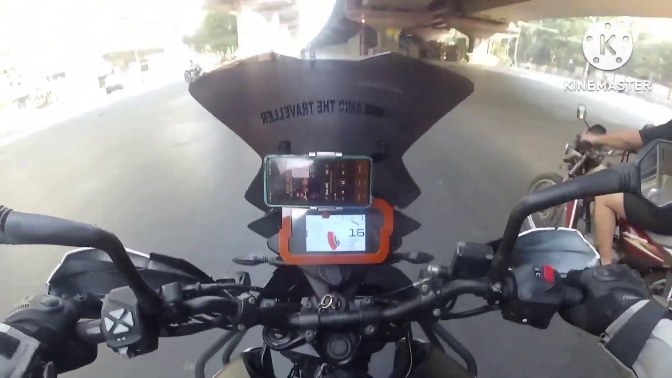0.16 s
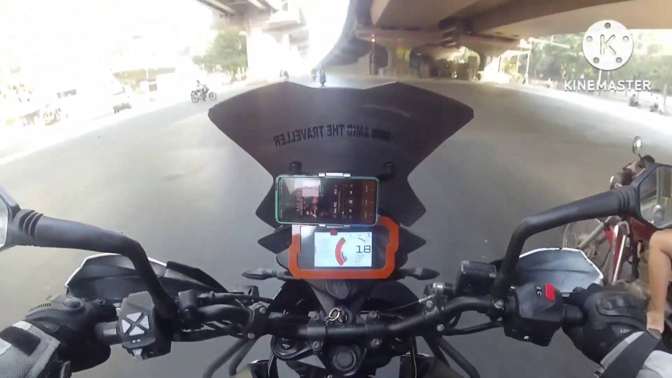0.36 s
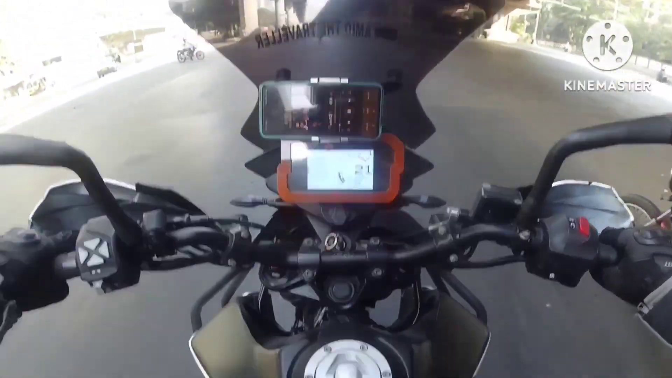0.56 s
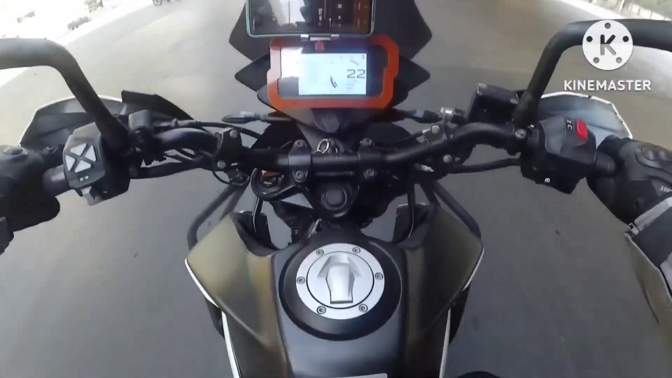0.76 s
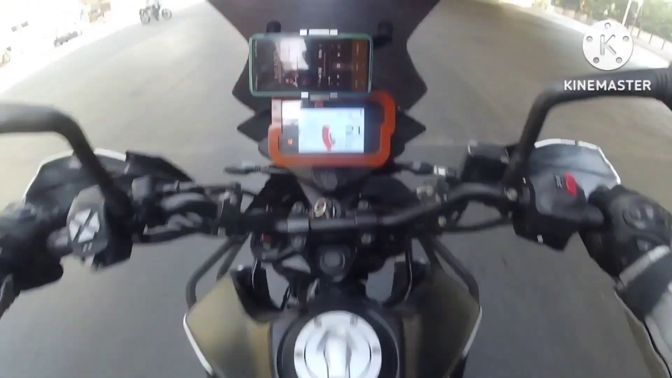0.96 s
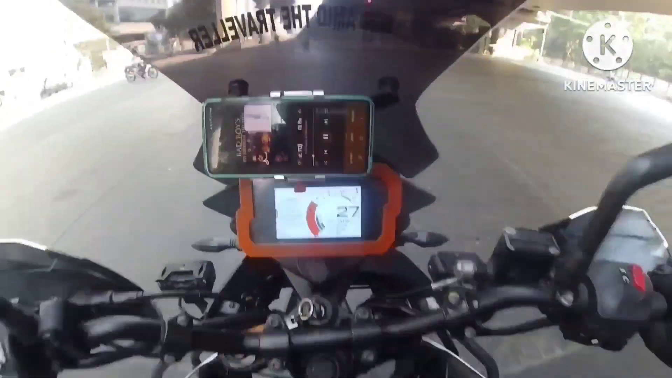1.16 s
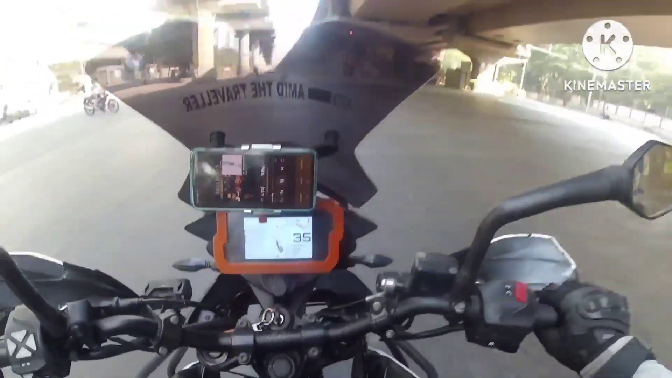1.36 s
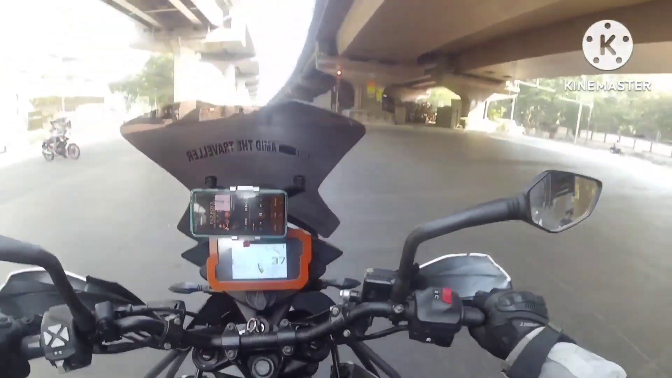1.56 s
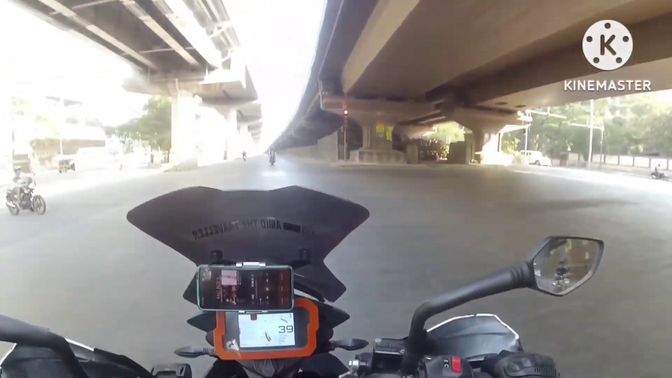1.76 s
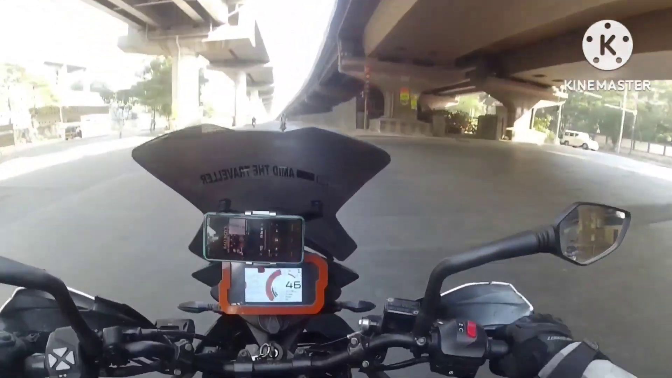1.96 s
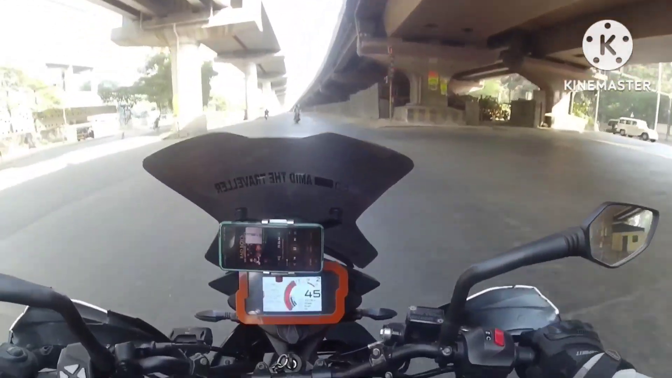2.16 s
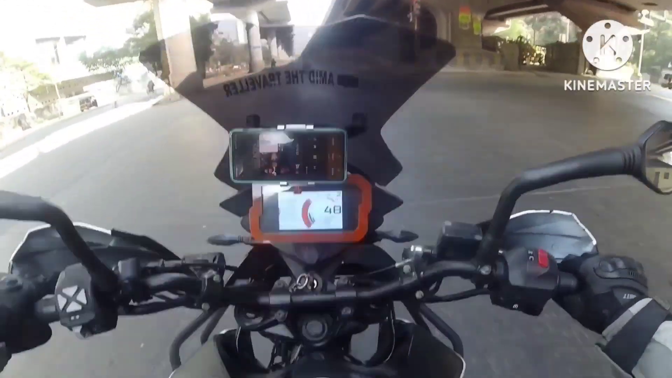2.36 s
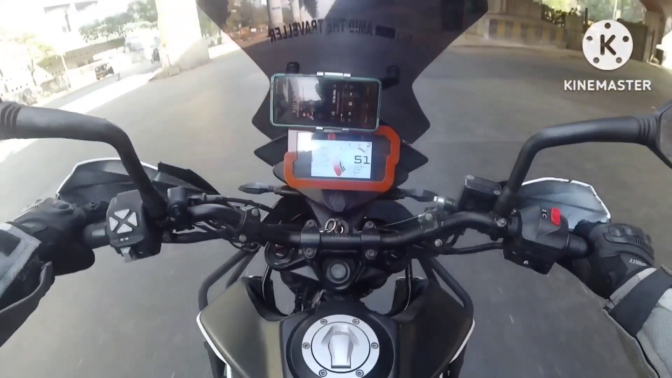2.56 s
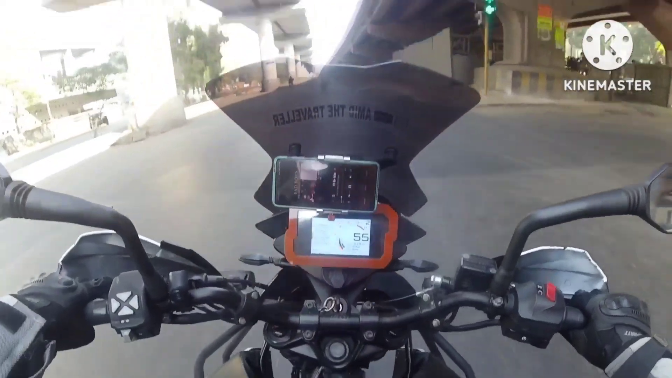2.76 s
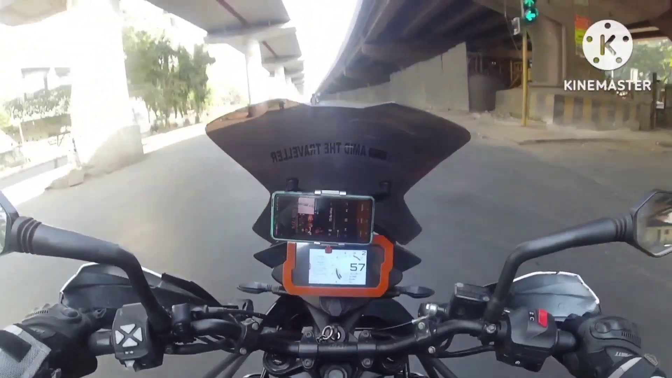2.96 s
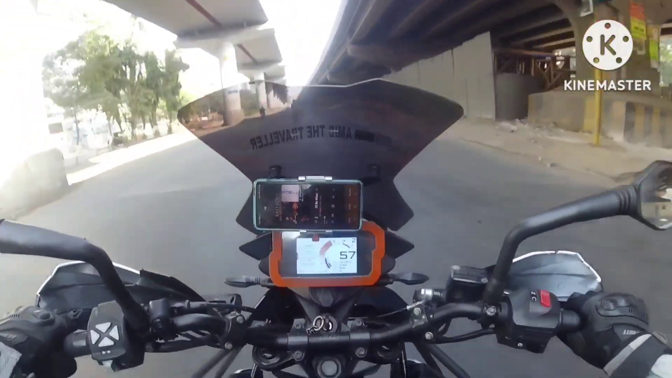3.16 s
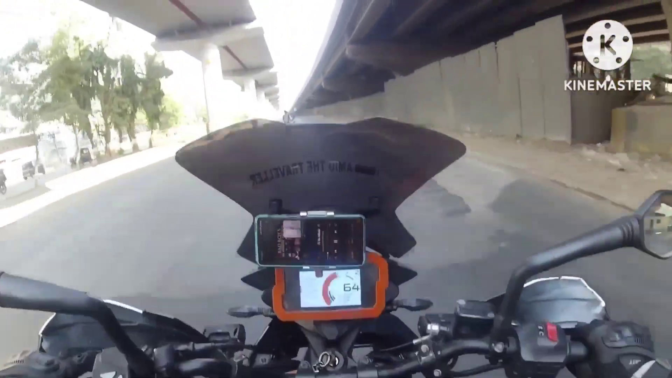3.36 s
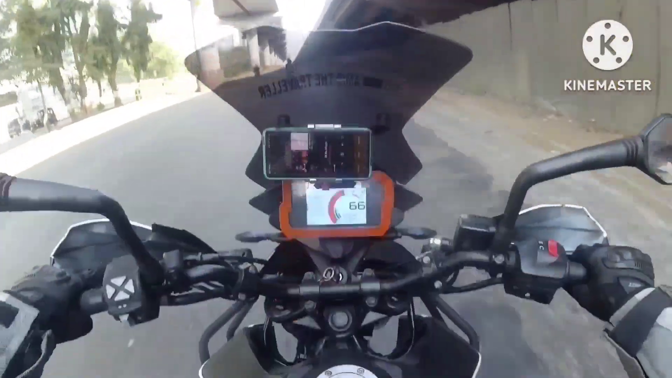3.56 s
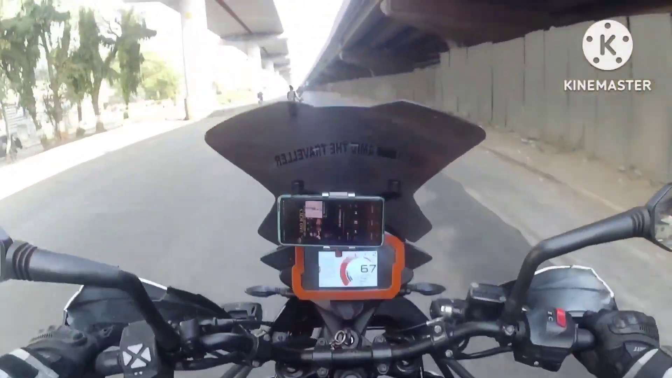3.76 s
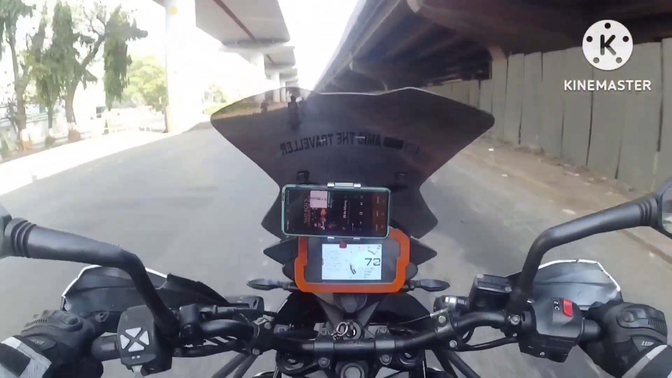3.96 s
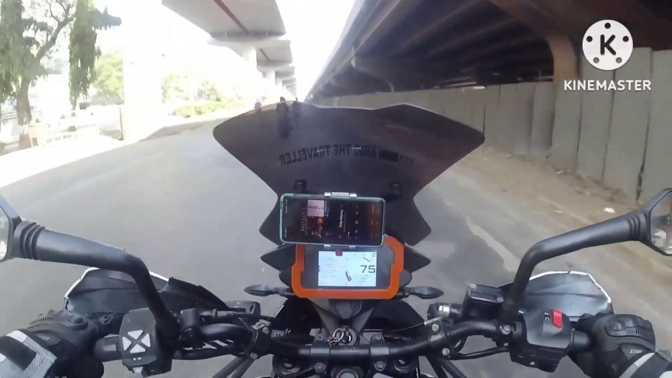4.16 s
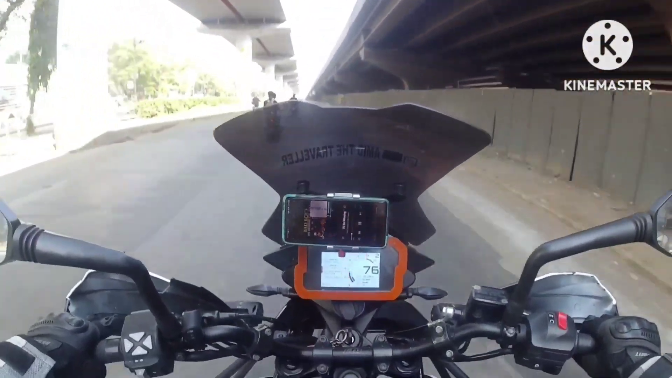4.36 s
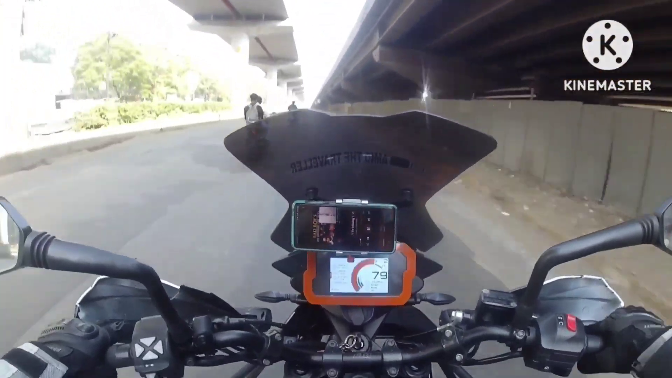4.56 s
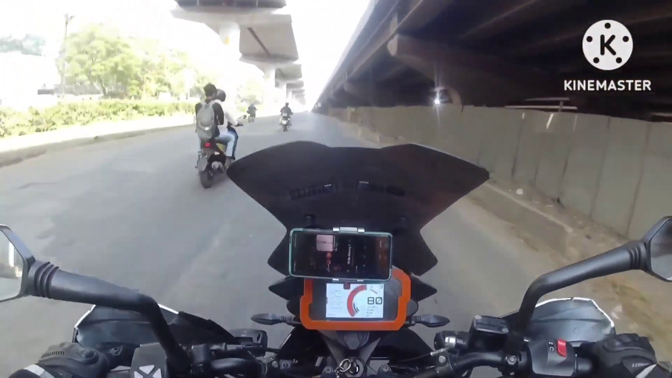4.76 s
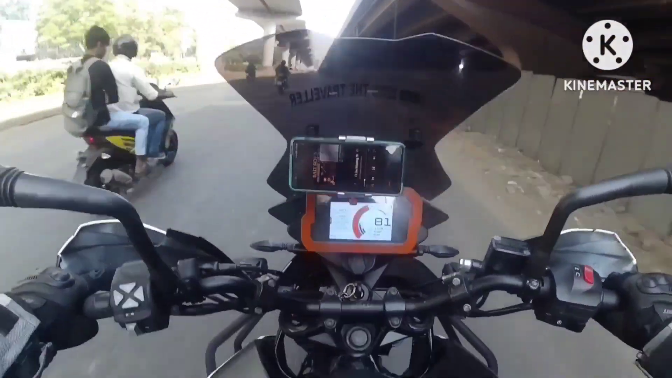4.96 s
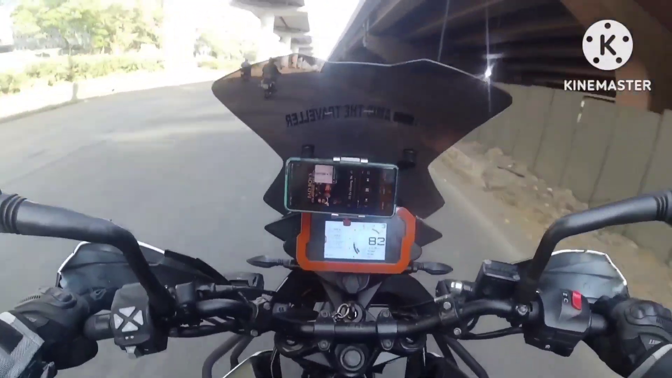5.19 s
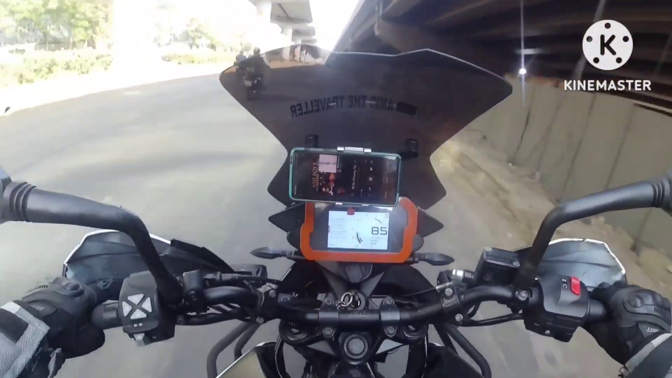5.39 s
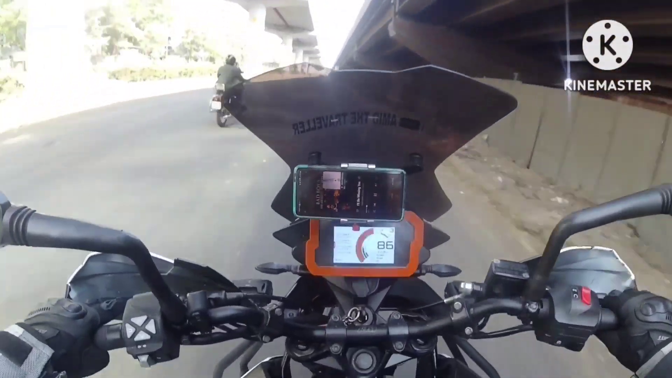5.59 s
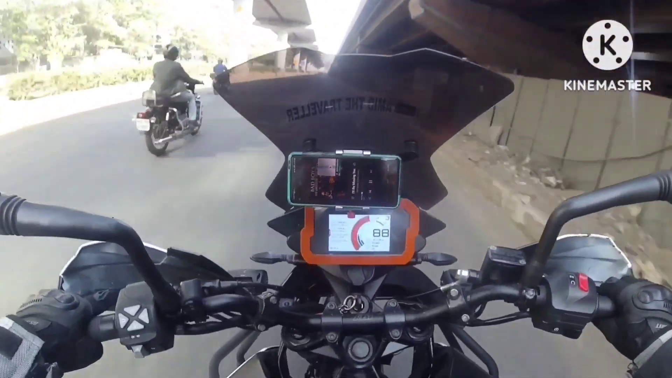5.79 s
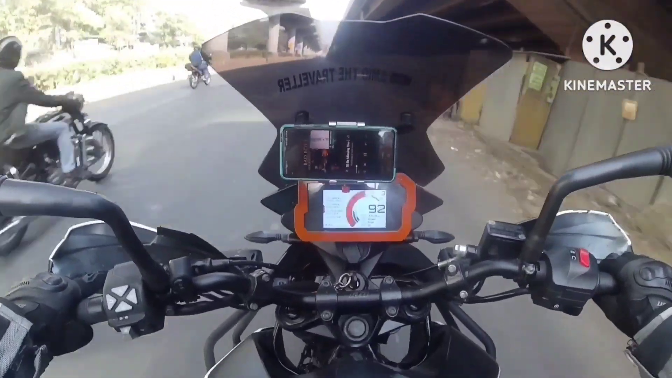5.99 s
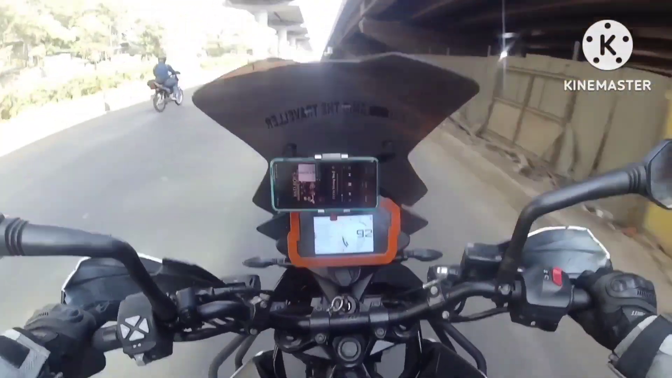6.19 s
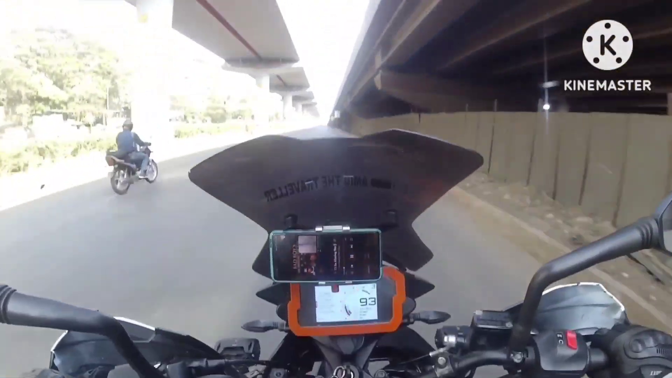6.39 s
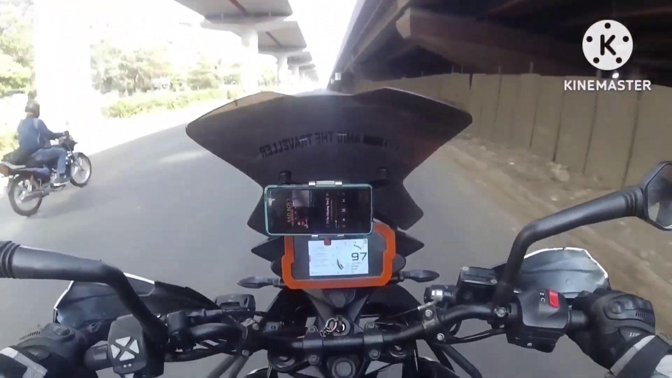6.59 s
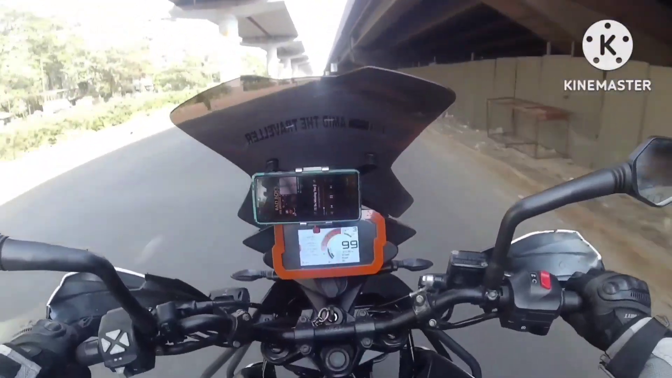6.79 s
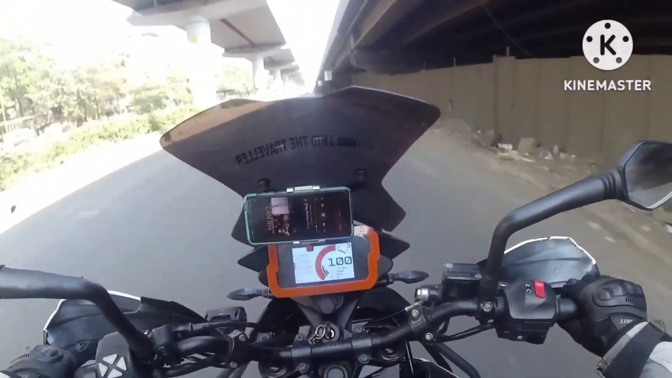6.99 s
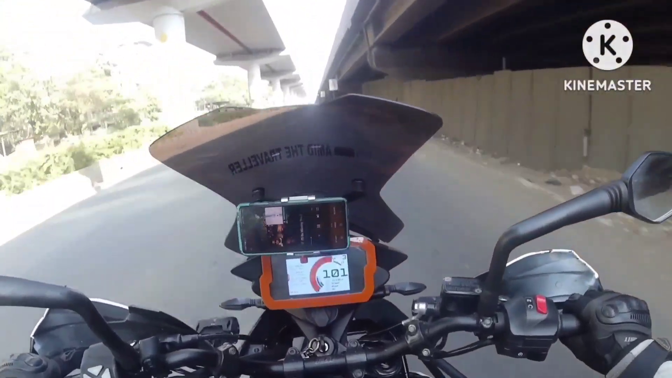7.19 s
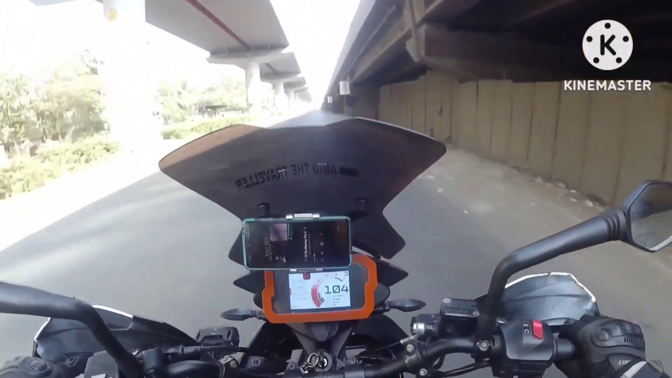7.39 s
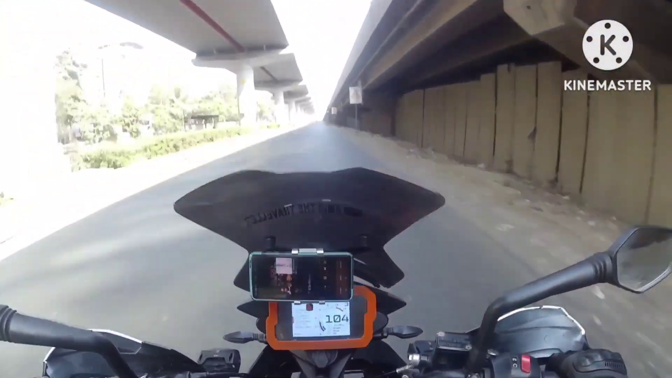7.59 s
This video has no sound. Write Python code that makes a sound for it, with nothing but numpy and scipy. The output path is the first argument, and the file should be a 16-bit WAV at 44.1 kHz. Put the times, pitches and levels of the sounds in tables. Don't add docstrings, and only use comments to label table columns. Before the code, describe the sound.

Close on-board microphone on a single-cylinder motorcycle outdoors. A throttle blip rises and falls, then the clutch bites with a short metallic clunk and the engine pulls away, booming, knocking and rattling. Three shifts briefly drop the pitch and load. Wind buffets grow from soft flutter to clipped, overloaded thuds that repeatedly blank out the engine, with hiss beneath.

```python
import sys
import numpy as np
from scipy import signal
from scipy.io import wavfile
from scipy.ndimage import uniform_filter1d

SR = 44100
rng = np.random.default_rng(int(sys.argv[2]) if len(sys.argv) > 2 else 0)


def generate_wav(sig):
    pcm = np.round(np.clip(np.atleast_2d(sig).T, -1, 1) * 32767).astype(np.int16)
    wavfile.write(sys.argv[1], SR, pcm)


def amplitude_ratio(level_db):
    exponent = np.asarray(level_db, float) / 20
    return 10 ** exponent


N = 336703

# start_s, spacing_ms, how_many, push [overload units]
BUFFET_TRAINS = [(2.187, 30, 1, 5.5), (2.32, 28.6, 2, 4.8), (3.089, 28, 1, 12), (3.259, 21.8, 2, 10.7),
                 (3.357, 26, 1, 2.9), (3.45, 20, 1, 10), (3.466, 34, 1, 15), (3.5, 18.3, 1, 12),
                 (3.515, 39.6, 1, 6.4), (3.888, 24.6, 3, 4.9), (3.986, 23.6, 1, 8.1), (4.042, 26.8, 2, 7.6),
                 (4.219, 19.3, 1, 12), (4.236, 45, 1, 21), (4.296, 22.6, 2, 2.8), (4.364, 22.8, 7, 3.5),
                 (4.542, 18, 4, 4.2), (4.629, 16.5, 1, 6.7), (4.647, 27, 2, 5.1), (4.737, 18.4, 6, 4.45),
                 (4.84, 37, 1, 5.5), (4.899, 19.9, 4, 9), (4.995, 35.2, 1, 4.5), (5.048, 24, 4, 4.8),
                 (5.635, 20.5, 3, 4.1), (5.714, 21, 1, 5), (6.56, 23, 1, 5.7), (6.655, 24.5, 1, 9.5),
                 (6.885, 31, 1, 2.9), (7.244, 22.2, 1, 8)]


def rms_one(x):
    return x / np.sqrt(np.mean(x ** 2) + 1e-20)


def in_time(rows):
    s, *columns = np.transpose(rows)
    return [np.interp(np.arange(N) / SR, s, c) for c in columns]


def against_speed(rows, firing_hz):
    hz, *columns = np.transpose(rows)
    return np.array([np.interp(firing_hz, hz, c) for c in columns])


def drift(rate):
    r = np.exp(-80 * np.pi * rate / SR)
    slow = signal.lfilter([1], [1, -2 * r, r * r], rng.standard_normal(N // 40 + 2002))[2000:]
    return np.interp(np.arange(N) / 40, np.arange(len(slow)), rms_one(slow))


def resonance(x, hz, width_hz):
    r = np.exp(-np.pi * width_hz / SR)
    poles = [1, -2 * r * np.cos(2 * np.pi * hz / SR), r * r]
    return signal.lfilter(np.array([1, 0, -1]) * (1 - r * r) / 2, poles, x)


def steep(x, hz, width_hz):
    return resonance(resonance(x, hz, width_hz), hz, width_hz)


def butter(x, hz, kind, order):
    return signal.sosfilt(signal.butter(order, hz, kind, fs=SR, output="sos"), x)


def effort(firing_hz):
    # take_up_starts_s, throttle_lifts_s, take_up_lasts_s, boom_db, exhaust_and_rattle_db
    gears = [
        (1.122, 2.085, .08, -0.5, 1),
        (2.37, 4.165, 0.31, -0.5, -0.5),
        (4.45, 6.29, 1, 0.5, 0.5),
        (6.623, 7.7, 0.15, -10.5, 5),
    ]
    # firing_hz, boom_db
    boom_map = [(36, -27), (44, -21), (50, -14), (60, -7), (67, -4), (73, -6.5), (76, -13), (80, -22)]
    # firing_hz, exhaust_db, rattle_db, knock_over_rattle_db, neighbouring_orders_db
    free_map = [(34, -23, -41, -12, -16), (44, -19, -38.5, -11, -16), (60, -15, -29.5, -8, -16),
                (73, -11, -26, -2, -18), (80, -9, -24, 3, -18)]
    # firing_hz, exhaust_db, rattle_db, knock_over_rattle_db, neighbouring_orders_db
    loaded_map = [(43.7, -13.5, -28.5, -2, 4), (53.5, -11, -28, -5, 0), (62.8, -15.5, -29, -5, -3.5),
                  (72, -14, -25.5, -6, -3)]
    throttle_shuts_s = 0.1
    t = np.arange(N) / SR
    load = np.zeros(N)
    levels = []
    for start_s, lift_s, take_up_s, gear_boom, gear_level in gears:
        taken_up = np.clip((t - start_s) / take_up_s, 0, 1)
        load += taken_up * np.clip(1 - (t - lift_s) / throttle_shuts_s, 0, 1)
        levels += [(start_s, gear_boom, gear_level), (lift_s, gear_boom, gear_level)]
    gear_boom_db, gear_db = in_time(levels)
    bitten = np.clip((t - gears[0][0]) / gears[0][2], 0, 1)
    shifting = bitten - load
    free = against_speed(free_map, firing_hz)
    loaded = against_speed(loaded_map, firing_hz)
    exhaust_db, rattle_db, knock_db, beside_db = (1 - bitten) * free + bitten * loaded
    boom_db = against_speed(boom_map, firing_hz)[0] + gear_boom_db - 7 * shifting
    exhaust_db = exhaust_db + gear_db - 8 * shifting
    rattle_db = rattle_db + gear_db + 2 * shifting
    beside_db = beside_db - 4 * shifting
    steady = 1 - 0.3 * bitten
    return boom_db, exhaust_db, rattle_db, knock_db, beside_db, steady


def intake(firing_hz, turns, boom_db, beside_db, flutter_db, breath_db):
    # pitch_hz, level_db
    air_box = [(130, -10), (170, -7), (230, -1), (275, 0), (300, -4), (314, -17), (328, -20), (350, -9),
               (420, -24)]
    # firing_order, level_db
    neighbours = [(5, -6), (6, -13.5)]
    box_hz, box_db = np.transpose(air_box)
    out = amplitude_ratio(breath_db) * rms_one(resonance(rng.standard_normal(N), 190, 110))
    for order, level_db in [(4, 0)] + [(order, db + beside_db) for order, db in neighbours]:
        shape_db = np.interp(np.log(order * firing_hz), np.log(box_hz), box_db)
        swell = amplitude_ratio(level_db + shape_db + flutter_db * drift(19.0))
        out = out + np.sqrt(2) * swell * np.sin(2 * np.pi * order * turns)
    return amplitude_ratio(boom_db) * out


def firings(turns, modes, level_db, uneven_db):
    sizes = amplitude_ratio(uneven_db * rng.standard_normal(1000))[turns.astype(int)]
    pulses = sizes * np.diff(np.floor(turns), prepend=np.floor(turns[0])) + 1e-18
    return amplitude_ratio(level_db) * rms_one(sum(amplitude_ratio(db) * steep(pulses, hz, w) for hz, w, db in modes))


def exhaust(turns, level_db):
    # pitch_hz, width_hz, level_db
    pipe = [(57.2, 53.3, 7.5), (93.2, 51.7, 7), (147.7, 58, -0.5), (194, 40, 6), (286.8, 68, 3.5),
            (355, 28, -4), (384, 70, -48), (552, 58, -17)]
    return butter(firings(turns, pipe, level_db, uneven_db=3.5), 566, "low", order=2)


def knock(turns, level_db):
    # pitch_hz, width_hz, level_db
    engine_cases = [(625, 60, 4), (860, 80, -5), (1030, 110, 2), (1180, 120, -2), (1810, 150, 2),
                    (2270, 300, 0), (3380, 260, -6)]
    return firings(turns, engine_cases, level_db, uneven_db=1.2)


def singing_db():
    # lower_db, upper_db
    rest_db = (-22.5, -19)
    # centre_s, length_s, lower_rise_db, upper_rise_db
    spells = [
        (.6, 1.3, 16, 8),
        (1.4, 0.54, 21, 7),
        (2.12, 0.41, 12, 1),
        (2.272, 0.15, -3, 7),
        (2.8, 2.3, 5, 13),
    ]
    t = np.arange(N) / SR
    swells = [np.outer(rise_db, np.clip(1 - 2 * abs(t - s) / length_s, 0, 1)) for s, length_s, *rise_db in spells]
    return np.array(rest_db)[:, None] + sum(swells)


def rattle(turns, rattle_db, steady, uneven_db):
    # pitch_hz, width_hz, level_db
    panels = [(520, 390, 2), (842, 200, 1), (1110, 430, 8.5), (1890, 86, 1), (2110, 730, 9), (3420, 690, 7),
              (3780, 390, 1.5), (7200, 540, -60), (8520, 6600, -6.5), (10700, 800, -43),
              (12800, 1800, -9.5), (14400, 3700, -10)]
    # pitch_hz, width_hz
    thin_parts = [(1763, 44), (3330, 38)]
    uneven = amplitude_ratio(uneven_db * rng.standard_normal(1000))[turns.astype(int)]
    strokes = np.exp(-4.5 * (turns % 1)) + .4 * np.exp(-5 * ((turns + .6) % 1))
    struck = (steady + uneven * strokes) * rng.standard_normal(N)
    rung = sum(amplitude_ratio(db) * steep(struck, hz, 1.19 * w) for hz, w, db in panels)
    between = amplitude_ratio(-46.5) * butter(struck, [400, 4600], "band", order=3)
    between += amplitude_ratio(-60) * butter(struck, 4600, "high", order=2)
    hum = rng.standard_normal(N)
    sung = sum(amplitude_ratio(db) * rms_one(steep(hum, hz, w)) for (hz, w), db in zip(thin_parts, singing_db()))
    return amplitude_ratio(rattle_db) * (rms_one(rung + between) + sung)


def clunk():
    # start_s, peak_db
    knocks = [
        (1.1693, 3),
        (1.178, -11),
    ]
    # pitch_hz, level_db, t60_s
    metal_modes = [(482, 6.5, 0.0075), (746, -15, 0.016), (1100, 2, 0.0046), (1540, -9, 0.016),
                   (2130, -7, 0.0062), (2720, -9.5, 0.01), (3900, -14, .006), (6850, -10, 0.0055)]
    clicks = np.full(N, 1e-18)
    for s, peak_db in knocks:
        clicks[round(s * SR)] = -amplitude_ratio(peak_db)
    out = np.zeros(N)
    for hz, level_db, t60 in metal_modes:
        r, w = amplitude_ratio(-60 / (t60 * SR)), 2 * np.pi * hz / SR
        strike = amplitude_ratio(level_db - 0.5) * np.sin(w)
        out += signal.lfilter([0, strike], [1, -2 * r * np.cos(w), r * r], clicks)
    crack = signal.lfilter([1], [1, -.985], np.abs(clicks)) * rng.standard_normal(N)
    return out + amplitude_ratio(-12) * butter(crack, [300, 5000], "band", order=2)


def air_flow():
    # time_s, turbulence_db
    wind_course = [(0, -8.5), (.6, -20), (1.05, -8.5), (1.2, -12), (1.6, -4), (2.05, -5), (2.25, 1),
                   (2.5, 0.5), (2.73, -5), (3.1, 6), (3.9, 6), (4.6, 15.5), (4.95, 12), (5.25, 9),
                   (5.55, 9.5), (6.0, 6), (6.6, 13), (7.63, 12.5)]
    return in_time(wind_course)[0] + .8 * drift(8.0)


def evened(x):
    return rms_one(x / (uniform_filter1d(x * x, round(.12 * SR)) + 1e-9) ** (.6 / 2))


def turbulence(level_db, offset_db, fine_db, reach):
    white = rng.standard_normal(N)
    slow = rms_one(steep(white, 21.18, 28.1))
    fast = rms_one(steep(white, 24, 36))
    speed = np.linspace(0, .75, N)
    fine = rms_one(butter(rng.standard_normal(N), [60, 300], "band", order=1))
    swing = reach * np.tanh(evened((1 - speed) * slow + speed * fast) / reach)
    return amplitude_ratio(level_db + offset_db + 2.16 * speed) * (swing + amplitude_ratio(fine_db) * fine)


def becalmed(eddies):
    calm_ms, calm_depth = 25.6, 0.63
    t, left = np.arange(N) / SR, np.ones(N)
    for s, ms, many, _ in BUFFET_TRAINS:
        since = t - s - round(many) * ms / 1000
        left *= 1 - calm_depth * (since > 0) * np.exp(-np.abs(since) * 1000 / calm_ms)
    return left * eddies


def trains():
    scatter_ms, scatter_db, lull_ms = 1.6, 3.5, 5.0
    rows = []
    for s, ms, many, push in BUFFET_TRAINS:
        many = round(many)
        late_ms, gain_db = rng.standard_normal((8, 2)).clip(-2, 2).T * [[scatter_ms], [scatter_db]]
        edges_ms = [k * ms + late_ms[k] * (0 < k < many) for k in range(many + 1)]
        for k, (a, b) in enumerate(zip(edges_ms, edges_ms[1:])):
            rows.append((s + a / 1000, b - a - lull_ms, push * amplitude_ratio(gain_db[k] * (k > 0))))
    return rows


def buffeted(eddies, edge_ms, blunt, recoil):
    rows = []
    for s, length_ms, push in trains():
        end = rows[-1][0] + rows[-1][1] / 1000 if rows else 0
        if .008 < s - end < .024:
            rows.append((end + 0.00194, (s - end - .004) * 1000, recoil))
        rows.append((s, length_ms, push))
    out, edge = eddies.copy(), round(edge_ms * SR / 1000)
    for k, (s, length_ms, push) in enumerate(rows):
        start = round(s * SR) - edge
        length = length_ms * SR / 1000
        span = np.arange(min(round(length) + 2 * edge, N - start))
        arch = np.sin(np.pi * span / (length + 2 * edge)).clip(0, 1)
        swept = np.clip(1 - 2.73 * arch, 0, 1)
        out[start + span] = swept * out[start + span] - (-1) ** k * push * arch ** blunt
    return out


def rush(level_db, rush_db, follows):
    # pitch_hz, width_hz, level_db
    hiss_bands = [(458, 45, 0), (1980, 1500, 0), (4020, 57, 2), (13700, 1400, -35)]
    white = rng.standard_normal(N)
    hiss = sum(amplitude_ratio(db) * rms_one(resonance(white, hz, w)) for hz, w, db in hiss_bands)
    return amplitude_ratio(rush_db + follows * level_db) * hiss


def scene():
    # time_s, firing_hz
    engine_speed = [(0, 48.1), (.2, 33.3), (.36, 45.1), (.57, 80.5), (1.0, 38.6), (1.48, 55), (1.65, 57.7),
                    (2.07, 68.7), (2.23, 58.6), (2.48, 52.7), (3.26, 62.3), (3.64, 67.3), (3.75, 72),
                    (4.2, 76.5), (4.45, 59), (6.3, 75), (6.6, 61.6), (7.63, 68.3)]
    firing_hz, = in_time(engine_speed)
    turns = np.cumsum(firing_hz * (1 + .002 * drift(6))) / SR
    struck_turns = turns + .35
    boom_db, exhaust_db, rattle_db, knock_db, beside_db, steady = effort(firing_hz)
    engine = intake(firing_hz, turns, boom_db, beside_db, flutter_db=2.5, breath_db=-14.5)
    engine += exhaust(turns, exhaust_db)
    engine += knock(struck_turns, rattle_db + knock_db)
    engine += rattle(struck_turns, rattle_db, steady, uneven_db=1.5)
    flow_db = air_flow()
    eddies = turbulence(flow_db, offset_db=-3.0, fine_db=-23, reach=2.6)
    wind = buffeted(becalmed(eddies), edge_ms=1.365, blunt=0.91, recoil=2.0)
    return (engine + clunk() + wind + rush(flow_db, rush_db=-37.5, follows=0.64))[None]


def top_cut(x):
    return signal.sosfilt(signal.butter(12, 16540, fs=SR, output="sos"), x)


def record(dry):
    # pitch_hz, width_hz, level_db
    tone_stage = [(4000, 300, -2.5), (5570, 11400, -8.5), (15700, 830, -6.5)]
    knee, ceiling, squeeze = .745, .865, .9
    straight = np.clip(dry, -knee, knee)
    bent = straight + (ceiling - knee) * np.tanh((dry - straight) / squeeze)
    for hz, width_hz, db in tone_stage:
        bent = bent + (amplitude_ratio(db) - 1) * resonance(bent, hz, width_hz)
    treble_edge = signal.cheby2(8, 27, 15850, fs=SR, output="sos")
    return top_cut(signal.sosfilt(treble_edge, bent))


dry = scene()
out = record(dry)
generate_wav(out)
```